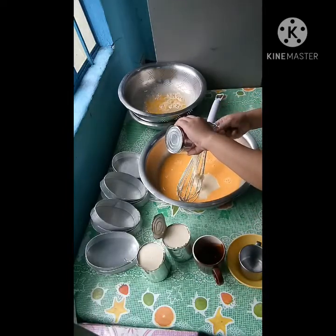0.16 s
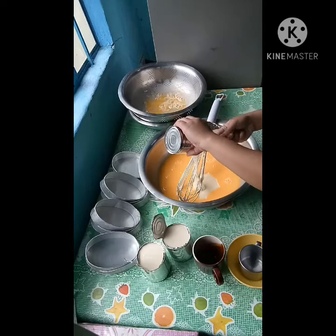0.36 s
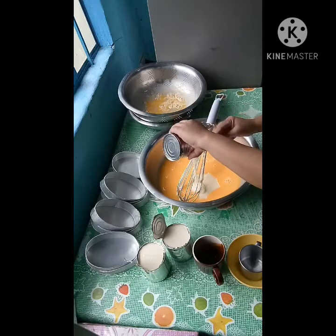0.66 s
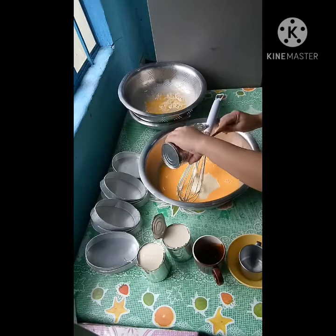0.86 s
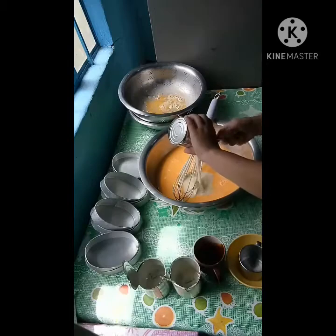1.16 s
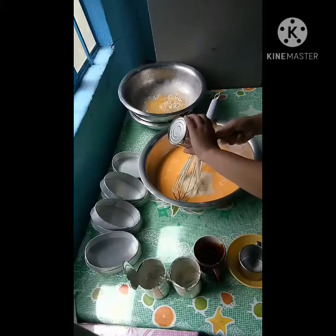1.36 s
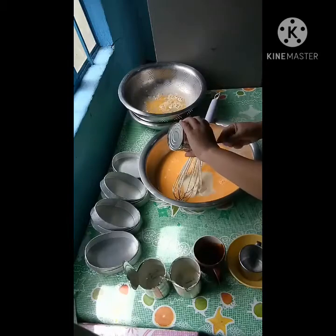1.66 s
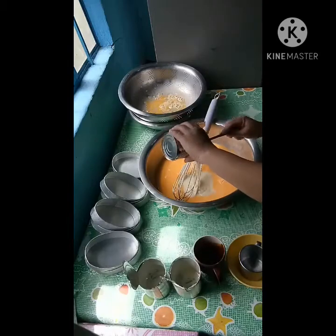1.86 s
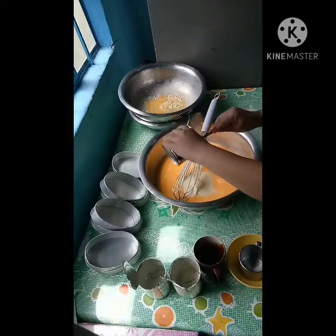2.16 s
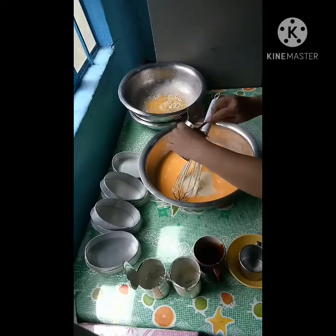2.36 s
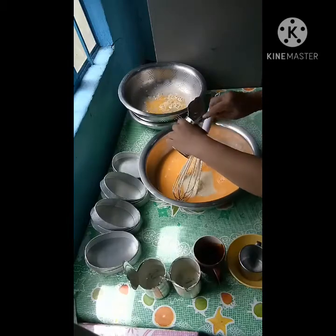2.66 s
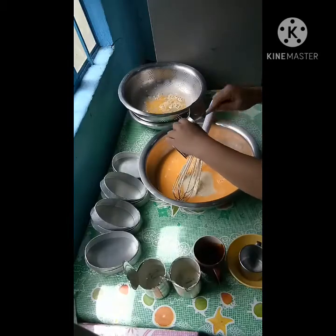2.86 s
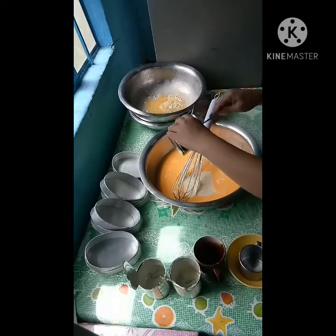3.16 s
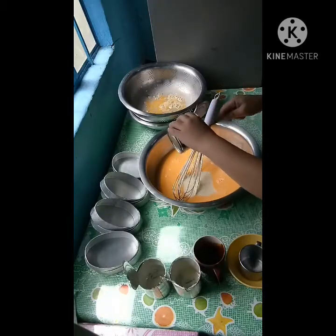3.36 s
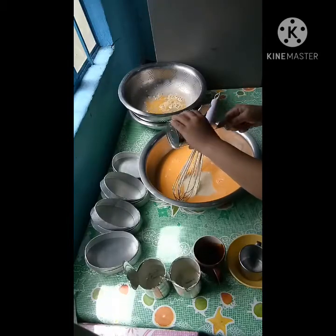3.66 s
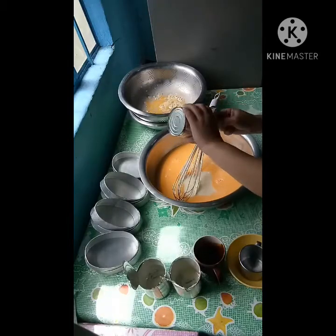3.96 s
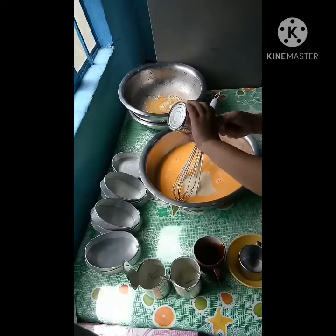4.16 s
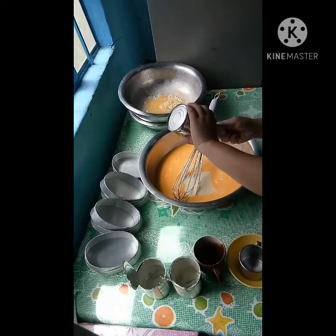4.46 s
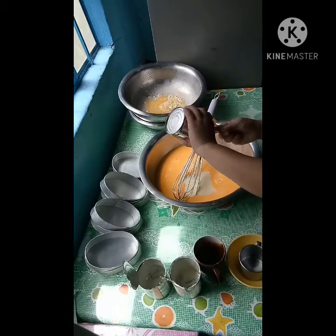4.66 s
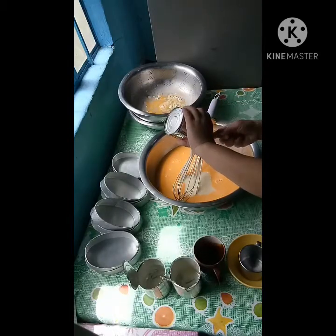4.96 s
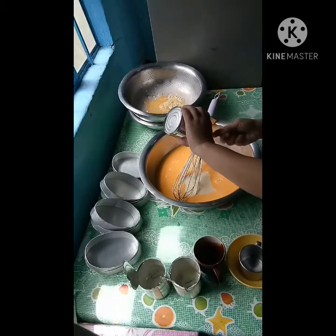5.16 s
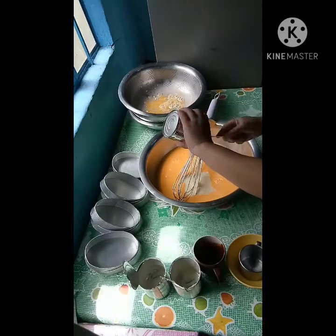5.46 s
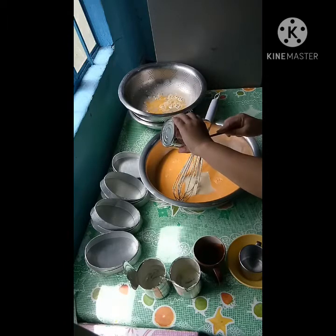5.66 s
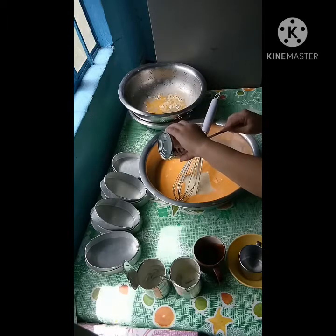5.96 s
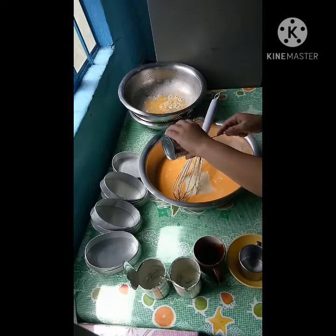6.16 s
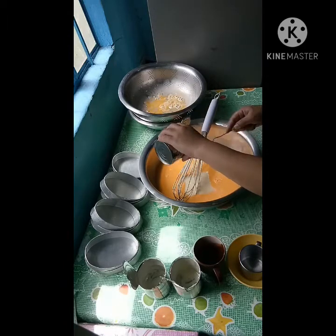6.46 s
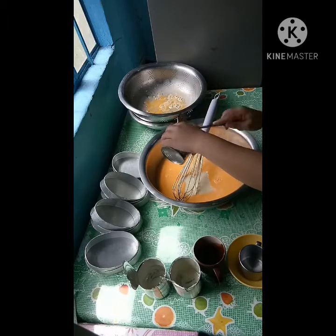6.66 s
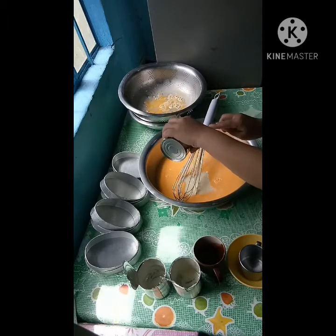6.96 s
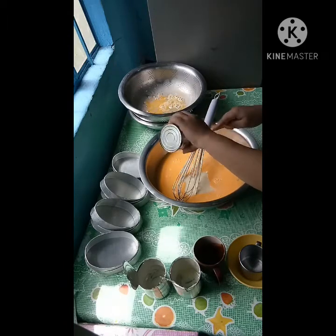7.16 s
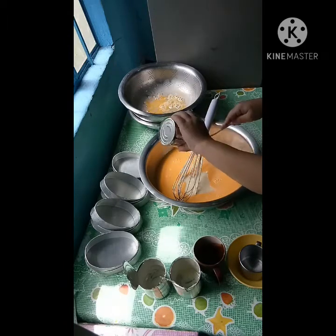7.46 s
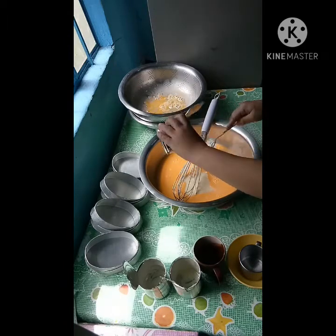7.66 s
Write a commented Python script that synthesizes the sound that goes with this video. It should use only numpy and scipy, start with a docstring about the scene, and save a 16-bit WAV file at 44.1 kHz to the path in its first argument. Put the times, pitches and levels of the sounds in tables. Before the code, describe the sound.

A steel utensil scrapes and knocks inside an open tin can over a steel bowl in a small kitchen.

```python
"""Utensil in a tin can

A steel utensil scrapes and knocks inside an open tin can held over a steel mixing bowl, in a small
kitchen. Each contact rattles the thin wall, rings the can's end and sounds the air inside; the bowl
rings along and the hard walls answer. The hand turns the can, shifting its pitch and colour.
A dull rumble swells and fades in the background. A small bird chirps faintly outside the window."""
import sys
import numpy as np
from scipy import signal
from scipy.fft import rfft, irfft, next_fast_len
from scipy.io import wavfile
from scipy.ndimage import uniform_filter1d

SR = 44100
rng = np.random.default_rng(int(sys.argv[2]) if len(sys.argv) > 2 else 0)


def generate_wav(sig):
    """Save sig (samples, or channels by samples) to the path in sys.argv[1] as 16-bit PCM at SR."""
    pcm = np.round(np.clip(np.atleast_2d(sig).T, -1, 1) * 32767).astype(np.int16)
    wavfile.write(sys.argv[1], SR, pcm)


N = 344421


def amp(db):
    """Decibels to gain."""
    return 10 ** (np.asarray(db) / 20)


def unit(x):
    """Scale to rms 1."""
    return x / np.sqrt(np.mean(x ** 2) + 1e-20)


def onset_unit(x, size=700):
    """Scale so that the attack has rms 1."""
    return x / np.sqrt(np.mean(x[:size] ** 2) + 1e-20)


def along(points, hz):
    """Read (Hz, value) points on a log axis."""
    freqs, values = np.transpose(points)
    return np.interp(np.log(hz + 1), np.log(freqs), values)


def at(rows, s):
    """The columns of a curve at time s."""
    times, *cols = np.transpose(rows)
    return [np.interp(s, times, col) for col in cols]


def filtered(x, gain):
    """Apply a gain that depends on frequency."""
    size = x.shape[-1]
    padded = next_fast_len(size + 8192)
    return irfft(rfft(x, padded) * gain(np.fft.rfftfreq(padded, 1 / SR)), padded)[..., :size]


def coloured(x, spectrum):
    """x shaped by the given spectrum, at rms 1."""
    return unit(filtered(x, lambda hz: amp(along(spectrum, hz))))


def resonate(x, hz, t60):
    """One mode driven by x, gain 1 at its centre."""
    decay = np.exp(-np.log(1000) / (t60 * SR))
    return 2 * signal.lfilter([1 - decay], [1, -decay * np.exp(2j * np.pi * hz / SR)], x).real


def add(track, s, sound):
    """Mix a sound into the track at time s."""
    part = track[max(round(s * SR), 0):][:len(sound)]
    part += sound[:len(part)]


def stick_slip(size, per_s=170, spread_db=5.0, slip_t60=0.011, smooth=0.33):
    """Steel sticks and slips: short bursts of uneven size over a smooth rub."""
    kicks = (rng.random(size) < per_s / SR) * amp(spread_db * np.clip(rng.standard_normal(size), -2, 2))
    power = signal.lfilter([1], [1, -np.exp(-2 * np.log(1000) / (slip_t60 * SR))], kicks ** 2)
    return unit(np.sqrt(unit(power) + smooth) * rng.standard_normal(size))


def contact_colour(spectrum, ripple_db, slope=0):
    """Each point of contact favours different modes; slope tilts the treble in dB per octave."""
    hz = np.union1d(np.geomspace(100, 16000, 70), np.transpose(spectrum)[0])
    tilt = slope * np.maximum(np.log2(hz / 2500), 0)
    ripple = ripple_db * np.clip(rng.standard_normal(len(hz)), -2, 2)
    return np.transpose([hz, along(spectrum, hz) + tilt + ripple])


# The wall's standout rings. Each row: pitch in Hz before tuning, level in dB, t60 in seconds.
WALL_MODES = [(1623, -0.5, 0.038), (1830, 1.5, 0.03), (2220, -1.5, 0.031), (2544, 8, 0.022),
              (2946, 6.5, 0.028), (3734, 4, 0.016), (4160, -2, .015)]
# The contact travels round the wall. Each row: time in seconds, favoured pitch in Hz.
CONTACT_SPOT = [(0.3, 2530), (0.7, 2980), (1.2, 1800), (1.7, 2810), (2.4, 2120), (2.6, 4040), (3.0, 3625),
                (3.15, 1654), (3.6, 1755), (4.3, 1888), (4.449, 3620), (5.3, 3763), (5.599, 2620),
                (6.35, 3720), (6.749, 3860), (6.9, 2870)]
def wall_modes(s, spread_octaves=0.17):
    """The contact at time s brings out the wall modes near its favoured pitch."""
    favoured, = at(CONTACT_SPOT, s)
    return [(hz, db - min(4 * (np.log2(hz / favoured) / spread_octaves) ** 2, 20), t60)
            for hz, db, t60 in WALL_MODES]


def rubbed(modes, tuning, force):
    """Friction keeps a set of modes singing; tuning multiplies their pitches."""
    return unit(sum(amp(db) * np.sqrt(t60) * resonate(force, pitch * tuning, t60)
                    for pitch, db, t60 in modes))


# The ring of the can's end. Each row: multiple of the end pitch, level in dB, t60 in seconds.
END_MODES = [(0.9, -12, 0.089), (0.999, 4, 0.071), (1.12, -1.5, 0.027), (1.301, -3.5, 0.047),
             (1.418, -14.5, 0.087)]
# The hollow air in can and bowl. Each row: multiple of the air pitch, level in dB, t60 in seconds.
AIR_MODES = [(0.71, -9.5, 0.042), (0.84, -13, 0.19), (1, 10, 0.12), (1.17, -15, 0.058)]
# The rasp of the thin wall's crowded modes. Each row: frequency in Hz, level in dB.
WALL_COLOUR = [(100, -12), (300, -3.5), (550, -1), (750, -1), (1250, 4), (1550, -2), (1900, 3), (2800, 5),
               (4000, 4.5), (5200, 1.5), (6600, 1.5), (7500, -10), (10000, -37.5)]
# The bright fizz on top. Each row: frequency in Hz, level in dB.
FIZZ_COLOUR = [(4000, -27), (6500, 3), (7600, 2), (8500, 5), (10000, 9), (11500, 2), (13800, -4.5),
               (14700, 10), (15250, 12), (15600, -2.5)]
# Grip and utensil depth retune the can. Each row: time in seconds, end pitch in Hz, air pitch in Hz.
GRIP_TUNING = [(0, 695, 439), (0.9, 700, 416.4), (1.2, 758, 383.5), (1.8, 815, 377), (2.6, 825, 391.3),
               (4.2, 815, 445.8), (5.7, 798, 448), (6.9, 796, 469.2), (7.5, 799, 444.3)]
# The balance as the can turns. Each row: time in seconds, then air, end and fizz trims in dB.
TURN_BALANCE = [(0, -4, -7, 0.5), (0.8, -4.5, -7.5, -8.5), (1.2, -15, -2, -4.5), (1.85, -4.5, 6, -5),
                (2.2, -15.5, -4, -17), (2.7, -14, -12.5, -3), (3.1, -16, 12, -5.5), (3.8, -8.5, -4, -1.5),
                (4.1, -3, 3, -2), (5.0, -0.5, 6, -3.5), (5.35, -3.5, -4, -6), (5.65, 4, 4, -8),
                (6.4, -11.5, -7.5, -4), (6.85, -5.5, 9.5, -4), (7.1, -0.5, -2, -16), (7.4, 7, -5, -9)]
# The scraping strokes. Each row: start in seconds, length in seconds, level in dB.
STROKES = [(0, 0.039, -29.5), (0.085, 0.099, -34.5), (0.229, 0.23, -37), (0.412, 0.11, -48),
           (0.508, 0.2, -33), (0.627, 0.11, -32.5), (0.739, 0.086, -28.5), (0.841, 0.038, -30.5),
           (0.932, 0.14, -52.5), (1.067, 0.081, -35.5), (1.242, 0.14, -35.5), (1.49, 0.098, -34),
           (1.639, 0.17, -33.5), (1.738, 0.14, -36), (1.84, 0.113, -29.5), (2.49, 0.11, -31.5),
           (2.727, 0.089, -29.5), (2.957, 0.11, -37), (3.387, 0.18, -38), (3.853, 0.16, -44),
           (3.97, 0.071, -34.5), (4.045, 0.137, -35.5), (4.165, 0.077, -36), (4.253, 0.22, -32.5),
           (4.456, 0.11, -39), (4.554, 0.18, -39), (4.745, 0.079, -31.5), (4.8, 0.15, -40),
           (4.99, 0.2, -36), (5.262, 0.19, -37.5), (5.479, 0.13, -34), (5.54, 0.15, -32.5),
           (5.708, 0.115, -34), (5.913, 0.06, -40.5), (6.328, 0.12, -37), (6.729, 0.08, -42.5),
           (6.848, 0.093, -40.5), (7.07, 0.13, -39.5), (7.185, 0.13, -45.5), (7.329, 0.12, -41.5)]
def scrapes(wall_db=-2, fizz_db=-2, end_db=-4, air_db=-4.5, mode_db=-8, rise_share=0.38, patch_s=0.044):
    """Each stroke drags steel over the wet tin and drives wall, end and enclosed air."""
    out = np.zeros(N)
    for start, length, db in STROKES:
        rise = rise_share * length
        air_trim, end_trim, fizz_trim = at(TURN_BALANCE, start + rise)
        end_hz, air_hz = at(GRIP_TUNING, start + rise)
        t = np.arange(int(length * SR) + SR // 5) / SR
        pressure = np.interp(t, [0, rise, length], [0, 1, 0]) ** 0.77
        force = pressure * stick_slip(len(t))
        # the contact slides on to a new patch of wall, and the colour shifts with it
        patches = [force * np.maximum(1 - abs(t - centre) / patch_s, 0)
                   for centre in np.arange(0, length + patch_s, patch_s)]
        rasp = unit(sum(patch.std() * coloured(patch, contact_colour(WALL_COLOUR, ripple_db=6.0))
                        for patch in patches))
        ring = amp(mode_db) * rubbed(wall_modes(start + rise), 0.99, force)
        fizz = amp(fizz_trim + fizz_db) * coloured(force, contact_colour(FIZZ_COLOUR, ripple_db=-1.5))
        end = amp(end_trim + end_db) * rubbed(END_MODES, end_hz, force)
        air = amp(air_trim + air_db) * rubbed(AIR_MODES, air_hz, force)
        add(out, start, amp(db) * force.std() * (amp(wall_db) * rasp + ring + fizz + end + air))
    return out


def struck(modes, tuning, t, damping):
    """Each blow rings the modes at new strengths, slightly retuned by the point of contact."""
    ring = np.zeros(len(t))
    for pitch, db, t60 in modes:
        envelope = amp(db + rng.normal(0, 3.3) - 60 * t * damping / t60)
        hz = tuning * pitch * rng.normal(1, 0.0098)
        ring += envelope * np.sin(2 * np.pi * (hz * t + rng.random()))
    return onset_unit(ring * (1 - np.exp(-t / 0.00075)))


def chatter(spectrum, t, hold_s=0.0059, t60=0.061):
    """Steel chatters on the tin: a noise burst that holds for a moment, then dies away."""
    envelope = amp(-60 * np.maximum(t - hold_s, 0) / t60) * (1 - np.exp(-t / 0.00009))
    return onset_unit(envelope * coloured(rng.standard_normal(len(t)), spectrum))


def taps(per_s=6, tap_db=-3, spread_db=3, sharpen=0.199):
    """The utensil catches lightly at random in mid-stroke; rows as in KNOCKS."""
    rows = []
    for start, length, db in STROKES:
        for chance, place, size, detune in rng.random((4, 4)):
            if chance < per_s * length / 4:
                s = start + length * (place + 0.5) / 2
                _, end_trim, fizz_trim = at(TURN_BALANCE, s)
                end_hz = at(GRIP_TUNING, s)[0] * (1 + sharpen * detune)
                rows.append((s, db + tap_db + spread_db * (2 * size - 1), end_hz, end_trim, fizz_trim))
    return rows


# How tightly the hand holds the can. Each row: time in seconds, multiple of the end's decay rate.
HAND_DAMPING = [(0.7, 0.37), (1.2, 0.46), (1.6, 0.49), (2.2, 2.6), (2.7, 2.9), (3.8, 3.2), (5.0, 0.96),
                (7.0, 1.7)]
# The firm knocks. Each row: start in seconds, level in dB, end pitch in Hz, end and fizz trims in dB.
KNOCKS = [(0.025, -33.5, 713, -7, -38), (0.116, -29, 717, -14, -5.5), (0.24, -24.5, 810, -6, -1.5),
          (0.262, -25.5, 685, -0.5, -5), (0.317, -27, 850, -6, -26), (0.363, -25.5, 815, -15, -11),
          (0.443, -35.5, 815, -27, -9), (0.538, -32.5, 900, -12, -12), (0.684, -17, 706, -11, -8),
          (0.857, -25, 715, -17, -7), (1.081, -35.5, 791, 0, -16), (1.205, -19.5, 714, 4, -10),
          (1.292, -33, 1016, 4, -5), (1.349, -31.5, 807, 0, -18), (1.398, -36, 704, 1.5, -4),
          (1.42, -26.5, 721, 2.5, -6), (1.598, -34, 742, 10.5, -13), (1.865, -32, 813, 8.5, -2),
          (1.956, -32.5, 790, 3, -18), (2.208, -17, 785, -2, -12.5), (2.424, -18, 860, 7, -5.5),
          (2.491, -25.5, 950, -0.5, -18), (2.547, -26.5, 886, 0, -6.5), (2.67, -15, 810, 2, -6.5),
          (2.716, -24, 754, 2, -12.5), (2.783, -26.5, 775, 3, -30), (2.922, -37.5, 870, 2.5, 1),
          (3.159, -22, 842, 9.5, -4.5), (3.249, -29, 730, -6, -5), (3.375, -35.5, 878, 0, -14),
          (3.386, -25, 864, 4.5, -3.5), (3.596, -43, 850, 15, -1), (3.613, -16.5, 872, -1.5, -4),
          (3.734, -32.5, 890, 5.5, -9), (3.834, -31.5, 873, 16.5, -18), (4.031, -22.5, 785, -0.5, -23),
          (4.107, -31, 1070, 7, -17), (4.18, -36, 1027, 7.5, 2.5), (4.248, -20.5, 809, -5, -12),
          (4.266, -23.5, 693, 3.5, -11), (4.293, -17, 1020, 4, -4), (4.395, -25.5, 773, 3.5, 1.5),
          (4.437, -23, 866, -1.5, -19), (4.528, -33, 833, 9.5, -7), (4.653, -28.5, 842, -3, -12),
          (4.75, -25, 1025, 2, -4.5), (4.768, -23, 800, 4, -8.5), (4.885, -31.5, 880, -8, -19),
          (5.005, -17.5, 890, 2, -9.5), (5.121, -34, 845, 8.5, -4.5), (5.147, -34, 1148, 6, -12),
          (5.261, -18, 817, 3, -11.5), (5.31, -22.5, 825, 2.5, -12.5), (5.371, -32, 993, 10.5, -4),
          (5.395, -27.5, 846, 5.5, -15), (5.582, -23, 760, -4.5, -11), (5.743, -31.5, 805, 11, 5),
          (5.786, -26.5, 874, 5.5, -12.5), (5.953, -27, 872, 2.5, -8), (6.319, -28, 879, 5, -13.5),
          (6.743, -27.5, 857, 1.5, -8), (6.753, -23.5, 795, -3, -12.5), (6.814, -30, 860, 7.5, -8),
          (6.92, -19.5, 1080, -17, -9), (7.02, -35, 1041, 3.5, -13.5), (7.07, -24, 1100, -25, -12),
          (7.262, -36.5, 826, 8, -13), (7.36, -33, 807, 2, -11)]
def knocks(end_db=-5, air_db=-6, wall_db=-3, fizz_db=-2, mode_db=-10, graze_db=-11.5, graze_s=0.008,
           usual_knock_db=-30, usual_fizz_db=-8):
    """The utensil grazes the tin, then strikes it; the hand damps the ring of the end."""
    out, t = np.zeros(N), np.arange(SR // 5) / SR
    approach = np.linspace(0, 1, int(graze_s * SR)) ** 2
    for s, db, end_hz, end_trim, fizz_trim in list(KNOCKS) + taps():
        air_hz = at(GRIP_TUNING, s)[1] * (1 + 0.02 * rng.standard_normal())
        # a hard blow gains less in the air than in the wall
        air_trim = at(TURN_BALANCE, s)[0] - 0.15 * (db - usual_knock_db)
        end = amp(end_trim + end_db) * struck(END_MODES, end_hz, t, damping=at(HAND_DAMPING, s)[0])
        air = amp(air_trim + air_db) * struck(AIR_MODES, air_hz, t, damping=0.9)
        slope = 0.43 * (fizz_trim - usual_fizz_db)  # a blow cushioned by the wet contents is dull
        clack = amp(wall_db) * chatter(contact_colour(WALL_COLOUR, ripple_db=4.0, slope=slope), t)
        ring = amp(mode_db) * struck(wall_modes(s), 0.99, t, damping=1)
        fizz = amp(fizz_trim + fizz_db) * chatter(FIZZ_COLOUR, t)
        add(out, s, amp(db) * (end + air + clack + ring + fizz))
        graze = approach * coloured(rng.standard_normal(len(approach)), WALL_COLOUR)
        add(out, s - graze_s, amp(db + graze_db) * graze)
    return out


# The bowl's ring. Each row: pitch in Hz, relative level in dB, t60 in seconds.
BOWL_MODES = [(319.4, 7.5, 0.21), (469, -4, 0.28), (647, -11, 0.48), (725, 4.5, 0.2), (778.7, 7.5, 0.14),
              (824, -30, 0.32), (913, 4.5, 0.23), (852, -3, 0.42), (1088, -0.5, 0.077)]
def bowl(can):
    """The steel bowl rings in sympathy with the can."""
    return sum(amp(db) * resonate(can, hz, t60) for hz, db, t60 in BOWL_MODES)


# The kitchen's short tail. Each row: frequency in Hz, t60 in seconds.
KITCHEN_DECAY = [(150, 0.4), (800, 0.34), (3000, 0.28), (7000, 0.32), (15000, 0.28)]
def kitchen(x, patterns=20, delay_s=0.007):
    """Hard walls answer; the echo pattern changes as the hands and can move."""
    out, step = np.zeros(N), N // patterns + 1
    for start in range(0, N, step):
        hz, t, noise = signal.stft(rng.standard_normal(SR // 2), SR, nperseg=256)
        decay = amp(-60 * t / along(KITCHEN_DECAY, hz)[:, None])
        tail = signal.istft(noise * decay, SR, nperseg=256)[1]
        echoes = signal.fftconvolve(x[start:start + step], tail / np.linalg.norm(tail))
        add(out, start / SR + delay_s, echoes)
    return out


# The room tone's colour. Each row: frequency in Hz, relative level in dB.
ROOM_COLOUR = [(20, -45), (45, -7), (86, -4), (107, -2), (125, -7.5), (280, -10), (500, -10.5),
               (900, -16.5), (1500, -20), (6300, -22), (8000, -34.5), (13500, -31.5), (15000, -29.5)]
def room_tone(db=-56):
    """The still room: a faint, steady bed of noise."""
    return amp(db) * coloured(rng.standard_normal(N), ROOM_COLOUR)


# The rumble's swells. Each row: time in seconds, level in dB.
RUMBLE_SWELLS = [(0.0, -60), (0.48, -53.5), (0.72, -45), (0.91, -58), (1.72, -60), (1.78, -46), (1.91, -55),
                 (3.13, -60), (3.2, -47), (3.5, -64), (3.81, -52.5), (5.85, -54.5), (5.89, -67), (7.2, -52),
                 (7.37, -65), (7.57, -48.5), (7.64, -65), (7.81, -62)]
# Its dull colour. Each row: frequency in Hz, relative level in dB.
RUMBLE_COLOUR = [(20, -20), (45, -9.5), (66, -15), (73, 3), (83, -3), (105, -8.5), (170, -13.5), (300, -20),
                 (900, -67.5)]
def low_rumble(trim_db=-1):
    """A faint, dull background rumble that swells and fades irregularly."""
    db, = at(RUMBLE_SWELLS, np.arange(N) / SR)
    return amp(db + trim_db) * coloured(rng.standard_normal(N), RUMBLE_COLOUR)


# The bird's calls. Each row: start in seconds, opening pitch in Hz, relative level in dB.
CHIRPS = [(2.048, 4800, -48), (2.344, 4940, -47), (3.07, 4900, -45), (3.78, 4850, -41), (6.013, 4770, -49),
          (6.04, 4060, -38), (6.496, 3860, -43), (7.5, 3575, -43), (7.515, 4360, -40)]
def bird(chirp_s=0.067, fall_hz_per_s=9900, waver=0.04):
    """Each chirp is a short downward whistle with a slightly unsteady pitch."""
    out, progress = np.zeros(N), np.linspace(0, 1, int(chirp_s * SR))
    for s, start_hz, db in CHIRPS:
        unsteady = np.interp(progress, np.linspace(0, 1, 20), rng.standard_normal(20))
        hz = (start_hz - fall_hz_per_s * chirp_s * progress) * (1 + waver * unsteady)
        add(out, s, amp(db) * np.sin(np.pi * progress) * np.sin(2 * np.pi * np.cumsum(hz) / SR))
    return out


# Stereo width in the treble. Each row: frequency in Hz, side gain in dB.
WIDTH = [(4000, -55), (5000, -27), (8000, -21), (12000, -17)]
def scene(bowl_db=-7, room_db=-5, bird_db=-8, bird_room_db=-6, low_cut_hz=230):
    """Can, bowl and distant bird in the room; only the treble differs between left and right."""
    # a small can radiates hardly any bass
    can = signal.lfilter(*signal.butter(2, low_cut_hz, "high", fs=SR), knocks() + scrapes())
    metal = can + amp(bowl_db) * bowl(can)
    chirps = bird()
    echoes = kitchen(amp(room_db) * metal + amp(bird_room_db) * chirps)
    mid = metal + amp(bird_db) * chirps + echoes + room_tone() + low_rumble()
    # a slightly delayed copy and echoes give the treble a little stereo width
    delayed_copy = np.pad(metal, (SR // 700, 0))[:N]
    side = filtered(delayed_copy + kitchen(amp(room_db) * metal), lambda hz: amp(along(WIDTH, hz)))
    return np.array([mid + side, mid - side])


# A blink of silence: start and end in seconds.
SILENCE = (1.043, 1.080)
TOP_HZ = 15480
def record(dry):
    """The sound cuts out for an instant, and the treble stops at TOP_HZ."""
    t = np.arange(N) / SR
    gate = uniform_filter1d(1.0 * ((t < SILENCE[0]) | (t > SILENCE[1])), size=40)
    return filtered(dry * gate, lambda hz: hz < TOP_HZ)


dry = scene()
out = record(dry)
generate_wav(out)
```